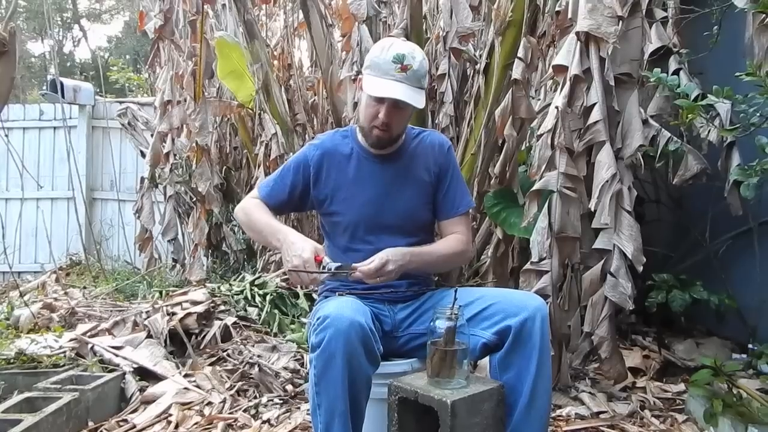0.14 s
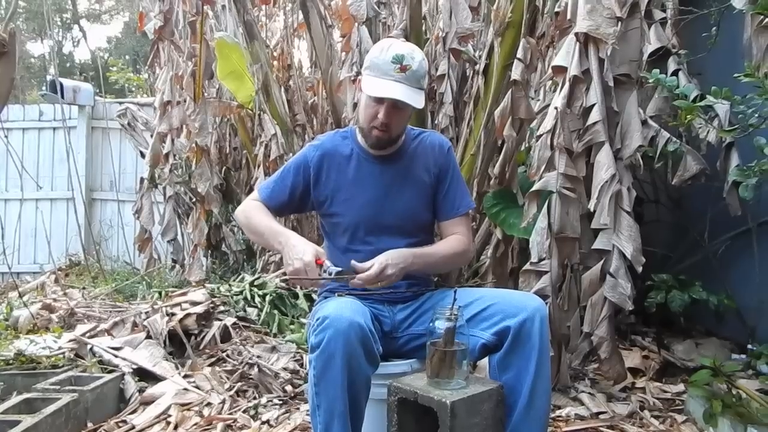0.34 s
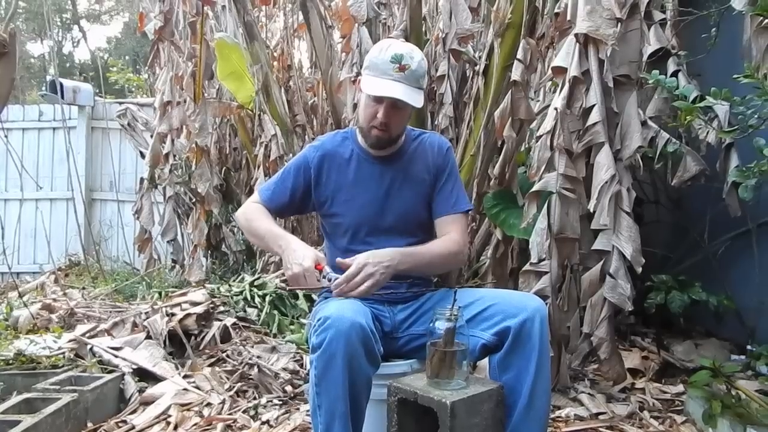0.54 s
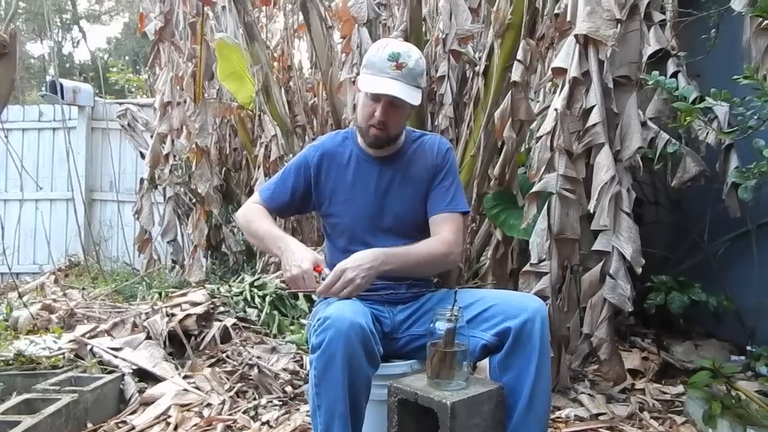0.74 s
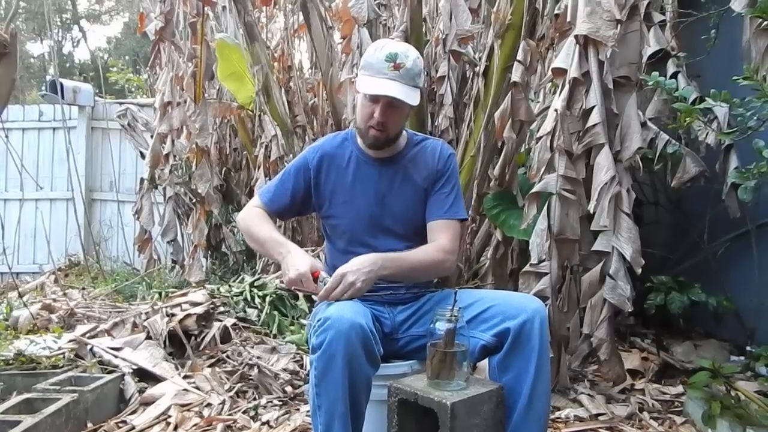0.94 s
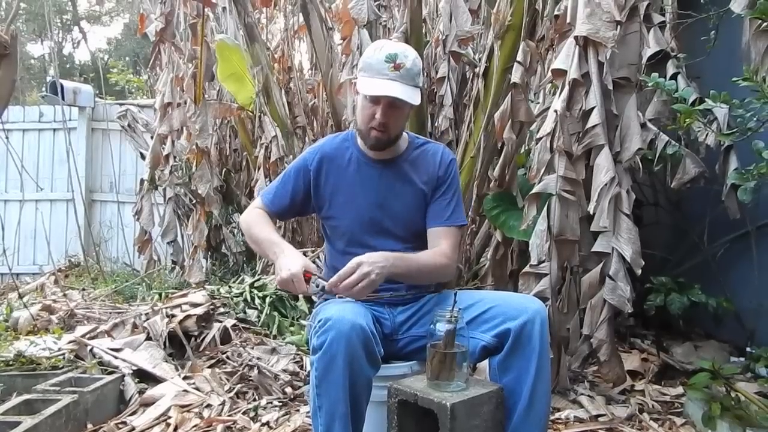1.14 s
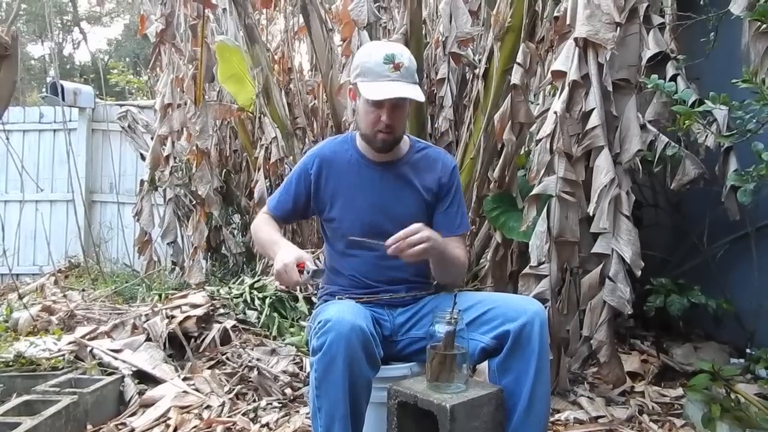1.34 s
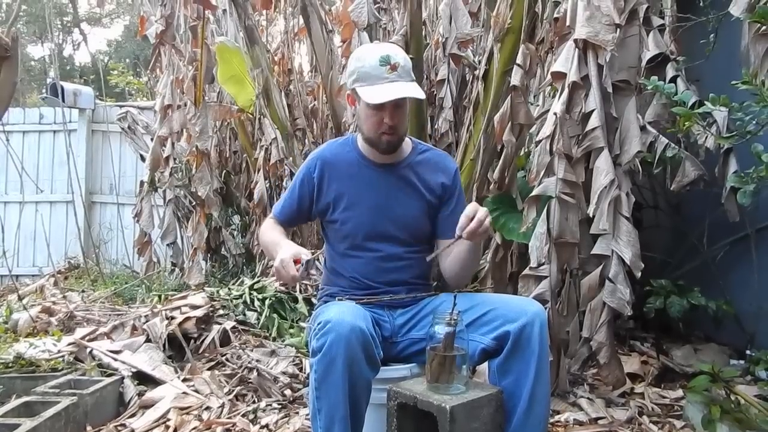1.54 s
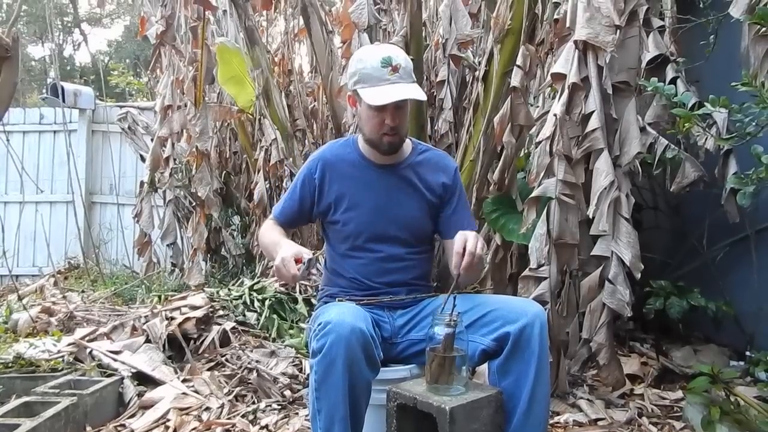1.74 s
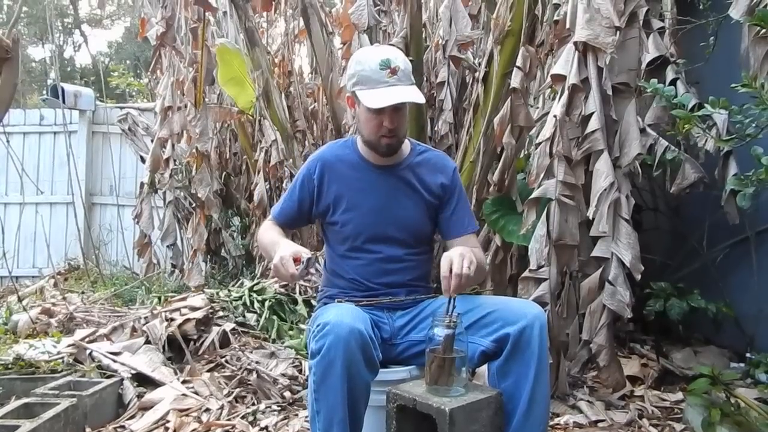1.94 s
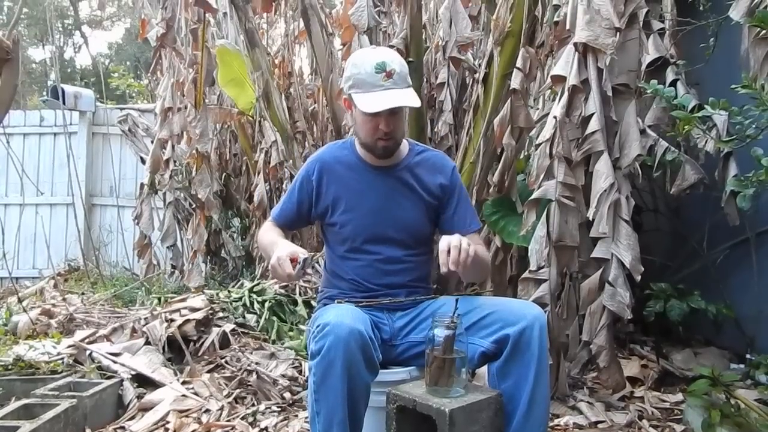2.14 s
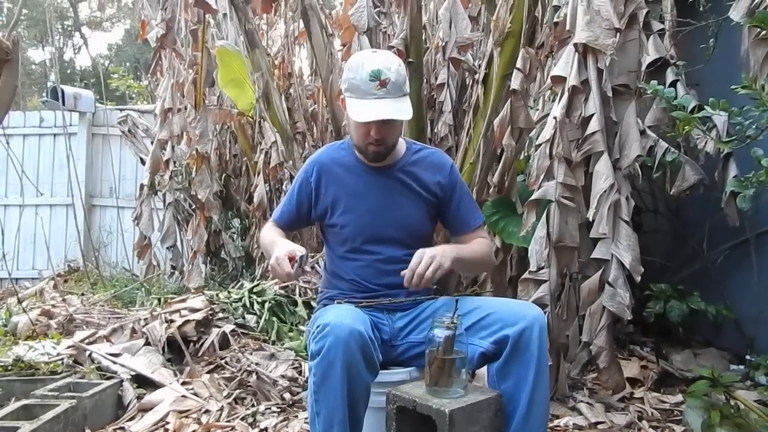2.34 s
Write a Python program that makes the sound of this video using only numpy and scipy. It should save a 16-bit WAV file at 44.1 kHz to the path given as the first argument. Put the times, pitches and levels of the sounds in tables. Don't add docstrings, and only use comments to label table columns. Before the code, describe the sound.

Pruning shears snip a thin twig: faint blade ticks at 0.13 and 0.19 s, a soft crunch into bark at 0.9, then fibres tear and steel snaps shut loudly at 0.97 with a short bright clack. Quiet taps on a glass jar follow at 1.93 and 2.19, the latter with a tiny squeak; wood knocks left at 2.34. Faint leaf rustles, high insect whine at left, thinning at 1.7, low distant traffic and machine hum.

```python
import sys
import numpy as np
from scipy import signal
from scipy.fft import rfft, irfft, next_fast_len
from scipy.io import wavfile
from scipy.ndimage import map_coordinates

SR = 44100
rng = np.random.default_rng(int(sys.argv[2]) if len(sys.argv) > 2 else 0)


def waveform_to_disk(signal):
    frames = np.transpose(np.atleast_2d(signal))
    scaled = np.clip(frames, -1, 1) * 32767
    samples = np.round(scaled).astype(np.int16)
    wavfile.write(sys.argv[1], SR, samples)


def to_linear_factor(level_db):
    exponent = np.asarray(level_db, float) / 20
    return 10 ** exponent


N = 104737

# t/s, peak/dB, brightness/dB
TOUCHES = [
    (.1312, -43, -1),
    (.1335, -46, -3),
    (.140, -48, -5),
    (.1908, -32, 0),
    (.1945, -45, 0),
    (.198, -43, -1),
]
# t/s, peak/dB, brightness/dB
BITES = [
    (.8983, -37, -6),
    (.9000, -41, 0),
    (.9014, -39, 0),
    (.9030, -41, 0),
    (.9068, -43, -2),
    (.9085, -43, 3),
    (.9105, -46, 2),
    (.914, -46, 0),
    (.9205, -47, -1),
]
# t/s, peak/dB, brightness/dB
TEAR = [
    (.9634, -30, 0),
    (.9644, -19, 1),
    (.9650, -17, 1),
    (.9659, -19, -2),
    (.9671, -20, 2),
]
# t/s, peak/dB, brightness/dB
BLADES_MEET = [
    (.9682, -6, 0),
    (.9697, -10, 0),
    (.9729, -15, 0),
    (.9744, -18, 0),
    (.9772, -22, 0),
    (.9797, -21, 1),
    (.9818, -25, 0),
    (.9858, -29, 0),
    (.9912, -30, 0),
]
# t/s, peak/dB, brightness/dB
CLAP = [
    (.9700, -23, 0),
]
# f/Hz, level/dB, T60/s
TOUCH_RING = [(2470, -3.5, 0.014), (6370, 2, 0.013), (9930, -2, 0.018)]
BITE_RING = [(1680, -1, .03), (2020, 0, .025), (6040, 3, .018), (10500, -6, .01)]
TWIG = [(1927, -11.5, 0.08), (2170, -13, .025), (2980, 0, 0.016), (3530, -8, 0.0046), (5780, 2, 0.012),
        (6360, -6, .012), (10900, -3, 0.01)]
STEEL = [(1400, -23, .016), (1918, -15.5, 0.076), (2085, -8.5, 0.031), (2980, -10.5, 0.017),
         (5620, -10, 0.034), (5940, -10, 0.027), (6315, 0, 0.036), (7400, -3, .015), (8020, 9, 0.012),
         (8480, 4, .015), (9330, -7, 0.017), (10300, -5, 0.011)]
HANDLES = [(310, 0, .035), (470, -1, .035)]
# f/Hz, level/dB
BARK = [(1500, -15), (2400, -3.5), (4500, -5.5), (6000, 4), (7600, -5.5), (10500, 1), (12500, -14),
        (15800, -21)]
SNAP = [(600, -46), (1100, -15), (1970, -15), (2990, -11), (4450, -11.5), (6000, -5.5), (8170, 3),
        (15800, -19.5)]
DULL = [(600, 17), (1500, 7), (4200, -2), (6000, -25), (15800, -33)]
# f/Hz, left-right/dB
CUT_LEFT = [(2000, -.8), (6000, 3), (13000, -1.5)]
BITE_LEFT = [(2000, -3.5), (6000, 8), (10500, 1.5)]

# t/s, peak/dB, brightness/dB
JAR_HIGH = [
    (1.9302, -41, 1),
    (1.9328, -47, 0),
    (1.939, -50, -3),
    (1.945, -50, -4),
    (1.952, -53, -4),
]
JAR_LOW = [
    (2.105, -62, -8),
    (2.1890, -43, 0),
    (2.1945, -49, 2),
    (2.1995, -45, 1),
    (2.204, -45, -1),
    (2.213, -57, -6),
]
# f/Hz, level/dB, T60/s
RING_HIGH = [(2300, -2, .015), (4300, -4, .035), (5380, 4, .018), (6400, -4, .015)]
RING_LOW = [(1100, -6, .015), (2200, 0, .022), (3340, -10, .02), (3850, -5, .015)]
# f/Hz, density/dB per Hz
SCRAPE = [(2000, -3), (3600, -10), (4200, 5), (6400, 1), (9000, -21), (15800, -32)]
# t/s, peak/dB, brightness/dB
KNOCK = [
    (2.3358, -24, 0),
    (2.3395, -40, -2),
]
# f/Hz, level/dB, T60/s
WOOD = [(340, 0, .007), (1110, -3, .008), (1630, -2, .011), (2150, -6, .006), (2780, 3, .009),
        (3400, -4, .006), (4400, -5, .006), (6700, -16, .004)]

# t/s, level/dB, length/s, left-right/dB
RUSTLES = [(.003, -62, .02, 0), (0.063, -60, .01, 0), (.086, -56.5, 0.035, -2), (0.257, -54, 0.032, 2),
           (0.39, -63, 0.017, -3), (0.48, -60, 0.027, 3), (0.672, -60, 0.015, -1), (0.821, -55, 0.012, -1),
           (1.3, -56, .015, -3), (1.785, -59.5, .02, -3), (1.841, -55, 0.022, -3),
           (1.935, -57.5, 0.051, -4), (1.918, -56, 0.024, -3), (2.005, -52, 0.043, -2),
           (2.075, -56, .015, 4), (2.105, -60, .02, 0), (2.145, -56, 0.039, 0), (2.192, -58, 0.017, -1),
           (2.328, -53.5, 0.015, 7)]
# f/Hz, density/dB per Hz
LEAF = [(1500, -6), (4000, -1), (7000, 3), (10000, 5), (13000, -9), (15800, -15)]

# f/Hz, width/Hz, level/dB
CHORUS = [(7940, 490, -9), (8100, 430, -12.5), (8423, 140, -6), (7370, 820, -15.5)]
SINGER = [(6790, 310, -8.5), (7130, 510, -7)]
# (f/Hz, density/dB per Hz)
TRAFFIC = [(20, -23), (40, -8.5), (105, -1), (160, -9), (300, -17.5), (600, -22.5), (870, -21), (1400, -31)]
AIR = [(900, -10), (1600, 2), (3000, -4), (5000, -9.5), (9000, -12), (12000, -21), (15800, -38)]
# f/Hz, correlation/1
ALIKE = [(60, 1), (150, 0.94), (380, 0.79), (950, 0.69), (2380, 0.077), (5980, 0.025), (15000, 0.03)]
# f/Hz, level/dB, wander/Hz
HUM = [(118.2, -53.5, 7.2), (240.7, -57.5, 3.82), (1297, -68, 2.05)]
# t/s, length/s, level/dB
WHISTLES = [
    (.72, .14, -70),
    (1.242, 0.42, -68),
]

# f/Hz, T60/s
YARD = [(300, 0.1), (2000, 0.15), (8000, 0.095), (12000, 0.11), (15000, 0.089)]
# f/Hz, width/Hz
NOTCHES = [(2500, 56), (5000, 90), (7500, 91), (8800, 43), (10000, 140)]
PORTS = np.array([[.5], [-.5]])


def shears():
    touches = struck(TOUCHES, TOUCH_RING, BARK, crack_db=.5, crack_t60=.0063, ring_db=-5, scatter_db=3)
    bites = struck(BITES, BITE_RING, BARK, crack_db=-1, crack_t60=.011, ring_db=-6.5, scatter_db=-.5)
    tear = struck(TEAR, TWIG, BARK, crack_db=-4.5, crack_t60=.0052, ring_db=-7.5, scatter_db=1.5)
    snap = struck(BLADES_MEET, STEEL, SNAP, crack_db=-2, crack_t60=.0052, ring_db=-16.5, scatter_db=3)
    clap = struck(CLAP, HANDLES, DULL, crack_db=-27, crack_t60=.008, ring_db=-4.5, scatter_db=2)
    cut = placed(tear + snap + clap, CUT_LEFT, lag_s=.00002, wet_db=-1.5)
    touches = placed(touches, [(6000, -5.5)], lag_s=.00009, wet_db=1.5)
    return cut + touches + placed(bites, BITE_LEFT, lag_s=.00009, wet_db=5.5)


def jar():
    high = struck(JAR_HIGH, RING_HIGH, SCRAPE, crack_db=-3.5, crack_t60=.038, ring_db=-5.5, scatter_db=3)
    low = struck(JAR_LOW, RING_LOW, DULL, crack_db=-12, crack_t60=.02, ring_db=-3, scatter_db=1.5)
    knock = struck(KNOCK, WOOD, DULL, crack_db=-14, crack_t60=.012, ring_db=-5, scatter_db=.5)
    high = placed(high, [(5000, 12)], lag_s=.0001, wet_db=-1)
    low = placed(low, [(3000, 1)], lag_s=.00002, wet_db=2)
    return high + low + squeak() + placed(knock, [(2000, 6.5)], lag_s=.0001, wet_db=-14)


def squeak():
    start_s, length_s, pitch_hz, level_db = 2.1885, .021, 3350, -50
    t = np.arange(N) / SR - start_s
    held = np.clip(t / .001, 0, 1) * to_linear_factor(-60 * np.clip(t - length_s, 0, None) / .03)
    return to_linear_factor(level_db) * held * np.sin(2 * np.pi * pitch_hz * t)


def rustles():
    grains_per_s, spread_db = 12000, 2
    t = np.arange(N) / SR
    chance, sign, size = rng.random((3, 2, N))
    grains = (chance < grains_per_s / SR) * np.sign(sign - .5) * to_linear_factor(-spread_db * np.log(size + 1e-4))
    grains = unit(filtered(grains, closed(LEAF)))
    shape = 0
    for s, db, length, left_db in RUSTLES:
        age = 4 * np.clip((t - s + .0011) / length, 0, None)
        shape = shape + to_linear_factor(db + left_db * PORTS) * age * np.exp(1 - age)
    return shape * grains


def insects():
    singer_stops_s = 1.70
    singing = np.clip((singer_stops_s - np.arange(N) / SR) / .01, 0, 1)
    chorus = wings(CHORUS, strokes_hz=58, depth=.2, left_db=4.5, alike=.069)
    singer = wings(SINGER, strokes_hz=52, depth=.55, left_db=9.5, alike=.078)
    return to_linear_factor(-55.5 + .27 * wobble(4)) * chorus + singing * to_linear_factor(-62.5 + .79 * wobble(4.8)) * singer


def wings(resonances, strokes_hz, depth, left_db, alike):
    def gain(f):
        return np.sqrt(sum(to_linear_factor(2 * db) / (1 + ((f - c) / (w / 2)) ** 2) ** 2 for c, w, db in resonances))

    stroke = np.sin(2 * np.pi * np.cumsum(strokes_hz * (1 + .015 * wobble(6.4))) / SR)
    return unit(pair(gain, [(7000, alike)]) * (1 + depth * stroke)) * to_linear_factor(left_db * PORTS)


def background():
    t = np.arange(N) / SR

    def tone(hz, wander_hz):
        return np.sqrt(2) * np.sin(2 * np.pi * np.cumsum(hz + wander_hz * wobble(12.5)) / SR)

    hum = sum(to_linear_factor(db + 2 * wobble(7.82)) * tone(hz, wander) for hz, db, wander in HUM)
    gate = sum(to_linear_factor(db) * np.clip(np.minimum(t - s, s + length - t) / .027, 0, 1) for s, length, db in WHISTLES)
    traffic = pair(closed([*TRAFFIC, (2500, -53.5)]), ALIKE)
    traffic = to_linear_factor(-41.5 + .88 * wobble(2.56) + .8 * PORTS) * traffic
    air = to_linear_factor(-57.5 + .11 * wobble(1.5)) * pair(closed(AIR), ALIKE)
    return traffic + air + hum + gate * tone(1630, 4.9)


def struck(contacts, modes, colour, crack_db, crack_t60, ring_db, scatter_db):
    blur_hz = 63.4
    out, t = np.zeros((3, N + SR)), np.arange(SR // 8) / SR
    hz, level, t60 = np.transpose(modes)[:, :, None]
    spectrum = closed(colour)
    for s, db, bright_db in contacts:
        def shade(f):
            return to_linear_factor(bright_db * np.log2(np.maximum(f, 1800) / 5000))

        scatter = scatter_db * rng.standard_normal(hz.shape)
        size = to_linear_factor(level + ring_db + scatter - 60 * t / t60) * shade(hz)
        drift = np.cumsum(rng.standard_normal(size.shape), axis=1)
        drift = drift * np.sqrt(2 * np.pi * blur_hz * hz / 5000 / SR)
        ring = (size * np.sin(2 * np.pi * hz * t + drift)).sum(0)
        crack = unit(filtered(rng.standard_normal(len(t)), spectrum))
        crack = filtered(crack, shade) * to_linear_factor(crack_db - 60 * t / crack_t60)
        click = filtered(1. * (np.arange(len(t)) == 64), lambda f: spectrum(f) * shade(f))
        click = click * np.linalg.norm(crack) / np.linalg.norm(click)
        wet, start = yard(click + to_linear_factor(-10) * ring), round(s * SR)
        out[0, start:start + len(t)] += to_linear_factor(db) * (crack + ring) * (1 - np.exp(-t / .000067))
        out[1:, start:start + wet.shape[1]] += to_linear_factor(db) * wet
    return out[:, :N]


def yard(x):
    fence_s, far_db, far_longer = .002, -18, 3.44
    hz, t, z = signal.stft(rng.standard_normal((2, SR // 3)), SR, nperseg=128)
    fall_db = -60 * t / along(YARD, hz)[:, None]
    tail = signal.istft(z * (to_linear_factor(fall_db) + to_linear_factor(far_db + fall_db / far_longer)), SR, nperseg=128)[1]
    late = filtered(x, lambda f: np.exp(-2j * np.pi * f * fence_s))
    return signal.fftconvolve(late[None], tail / np.linalg.norm(tail[0]), axes=1)


def placed(x, left_db, lag_s, wet_db):
    def ports(f):
        return to_linear_factor(along(left_db, f) * PORTS) * np.exp(-2j * np.pi * f * lag_s * PORTS)

    return filtered(x[0], ports) + to_linear_factor(wet_db) * x[1:]


def pair(gain, alike):
    def mid_side(hz):
        turn = np.arccos(np.clip(along(alike, hz), -1, 1)) / 2
        return gain(hz) * [np.cos(turn), np.sin(turn)]

    mid, side = filtered(rng.standard_normal((2, N)), mid_side)
    return unit(np.array([mid + side, mid - side]))


def wobble(rate):
    return map_coordinates(rng.standard_normal(int(N * 60 / SR) + 4), [np.arange(N) * rate / SR])


def filtered(x, response):
    m = next_fast_len(x.shape[-1] + SR // 4)
    return irfft(rfft(x, m) * response(np.fft.rfftfreq(m, 1 / SR)), m)[..., :x.shape[-1]]


def closed(points):
    return lambda hz: to_linear_factor(along([(points[0][0] / 2, -60), *points], hz))


def along(points, hz):
    f, v = np.transpose(points)
    return np.interp(np.log(hz + 1), np.log(f + 1), v)


def unit(x):
    return x / np.sqrt(np.mean(x ** 2) + 1e-20)


def scene():
    return shears() + jar() + rustles() + insects() + background()


def low_pass(x):
    return signal.sosfilt(signal.butter(12, 16460, fs=SR, output="sos"), x)


def record(dry):
    top_hz = 15800

    def microphone(f):
        return np.prod([(f - c) / (f - c - .5j * w) for c, w in NOTCHES], axis=0) * (f < top_hz)

    return low_pass(filtered(dry, microphone))


dry = scene()
out = record(dry)
waveform_to_disk(out)
```